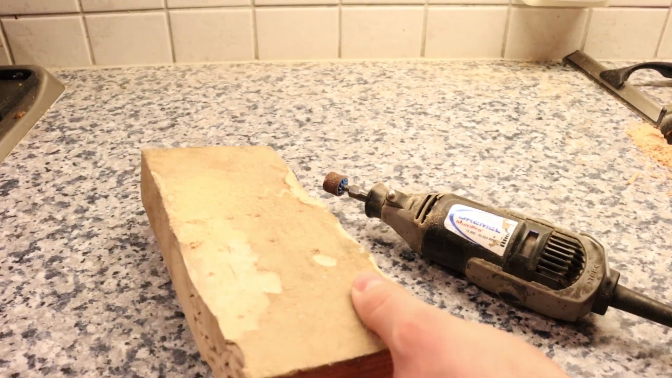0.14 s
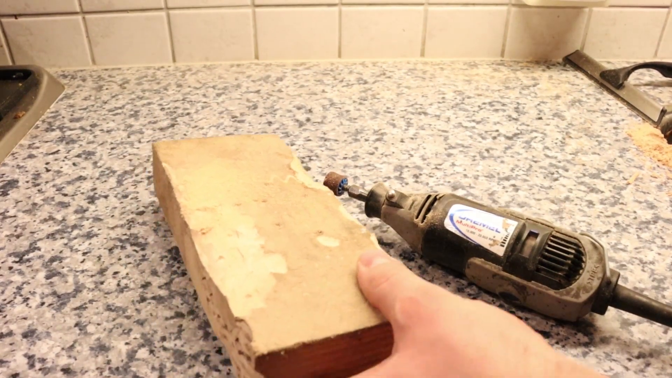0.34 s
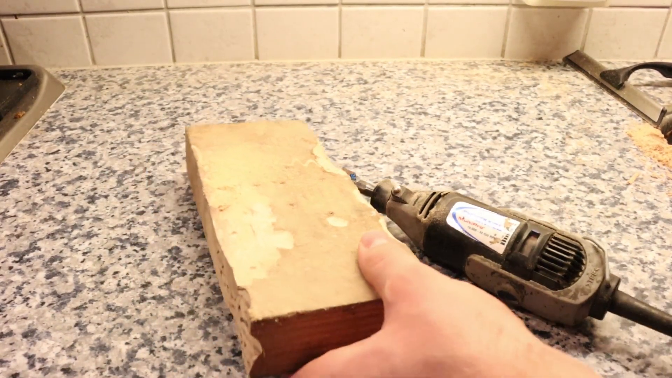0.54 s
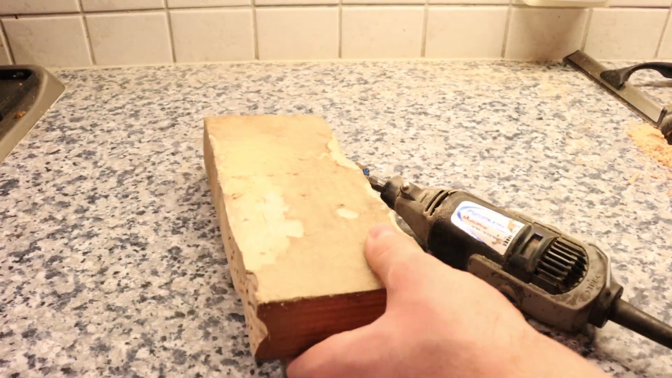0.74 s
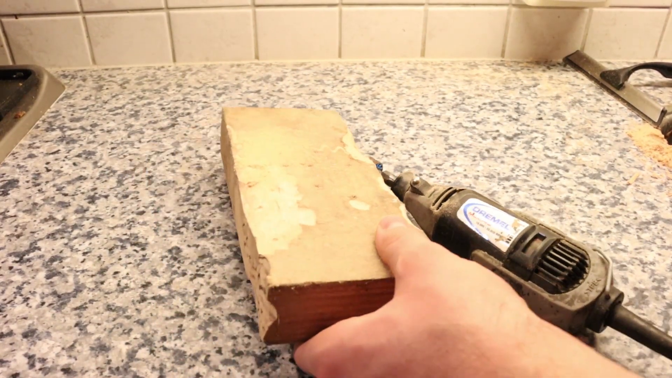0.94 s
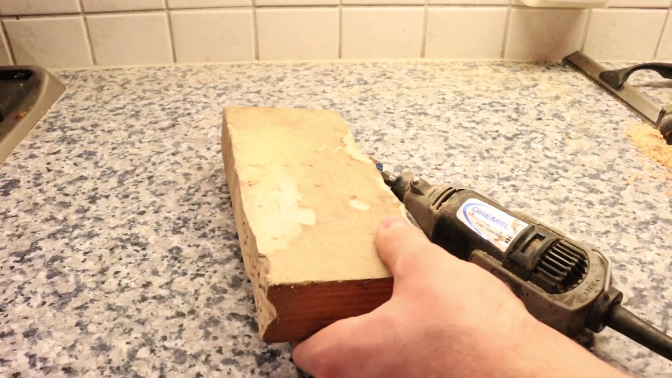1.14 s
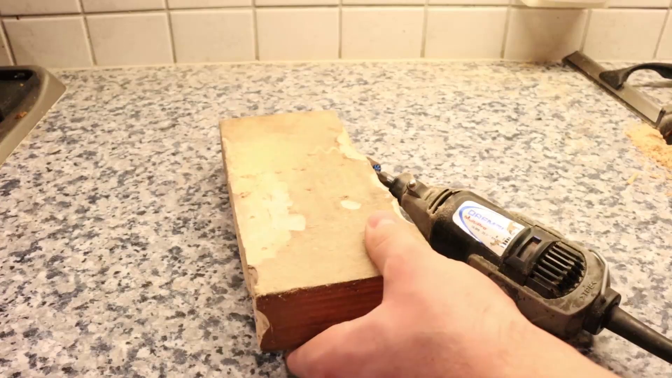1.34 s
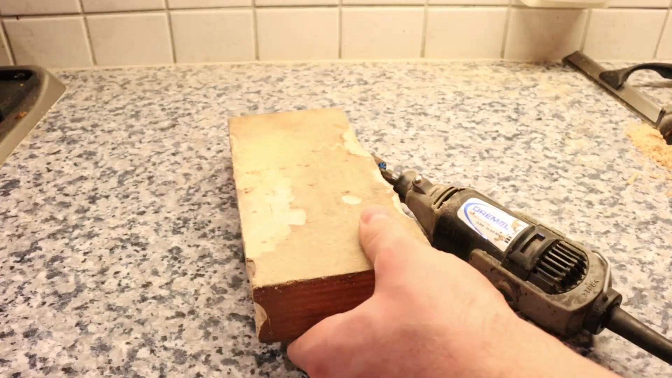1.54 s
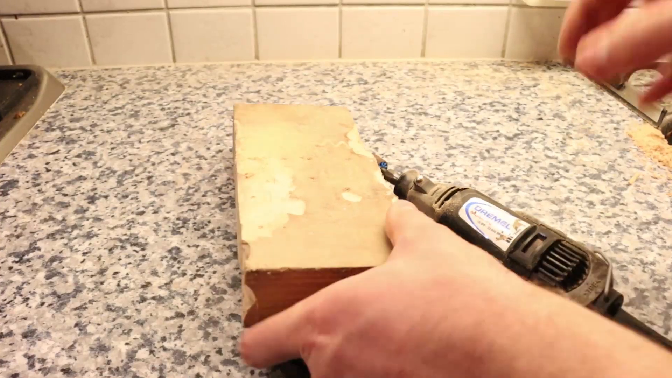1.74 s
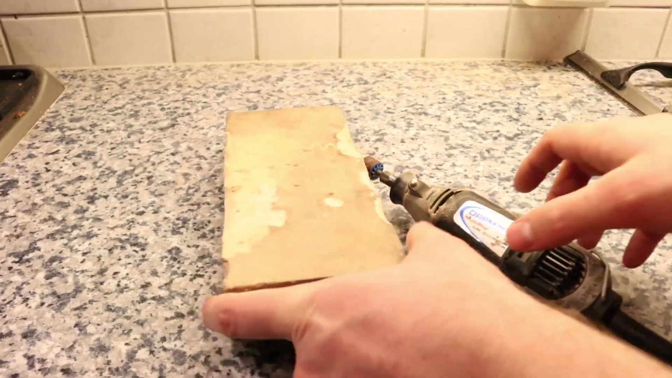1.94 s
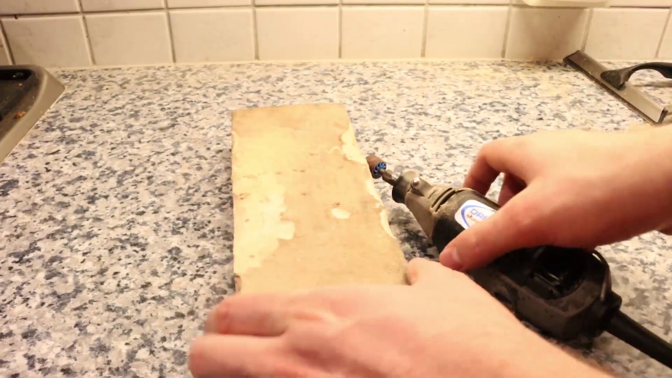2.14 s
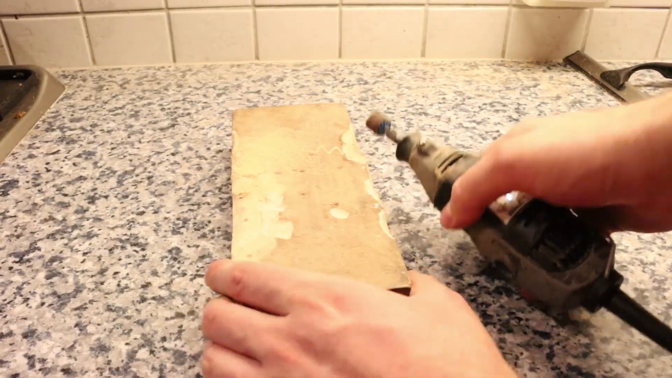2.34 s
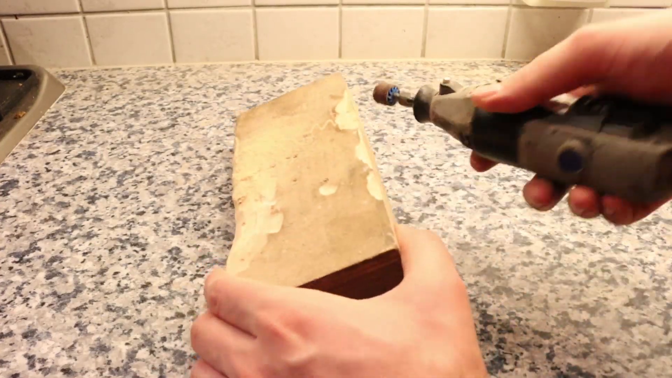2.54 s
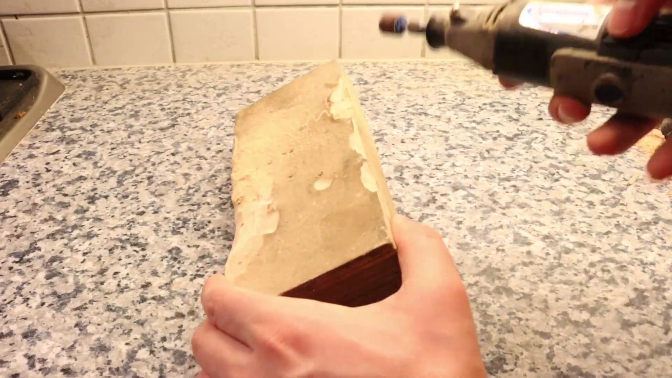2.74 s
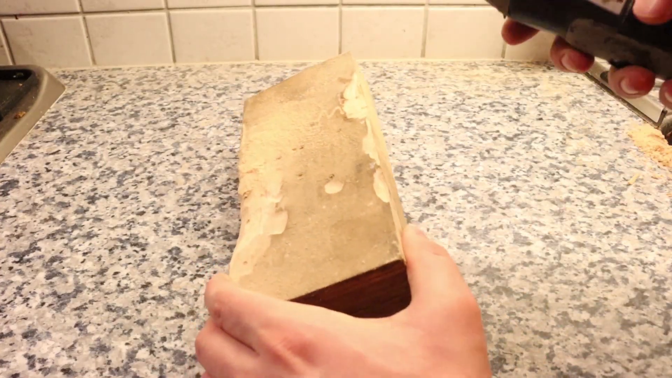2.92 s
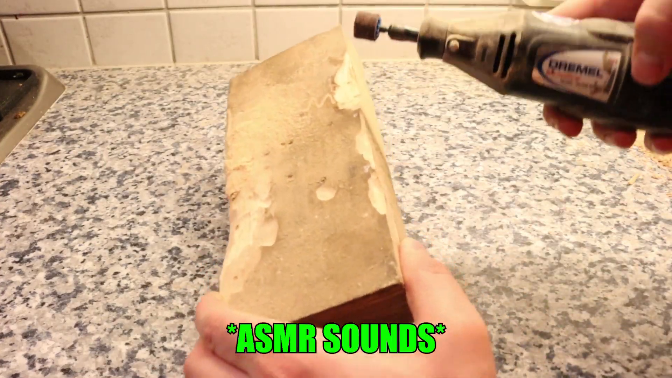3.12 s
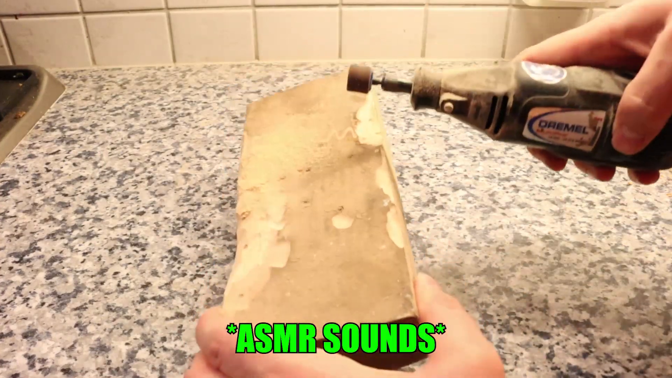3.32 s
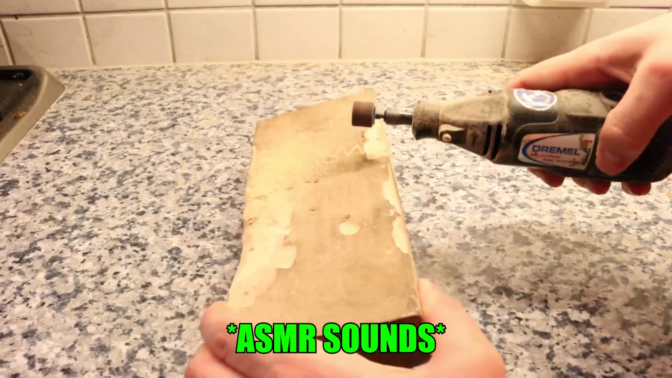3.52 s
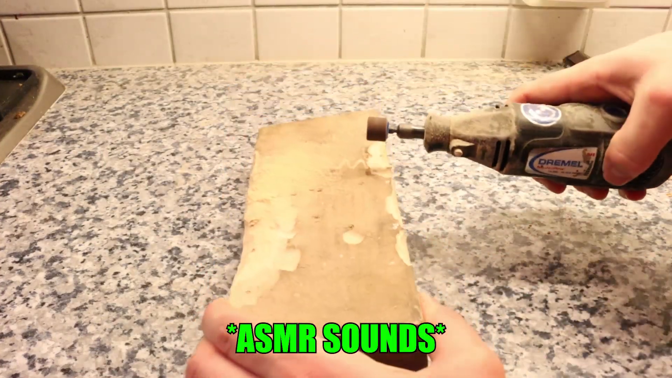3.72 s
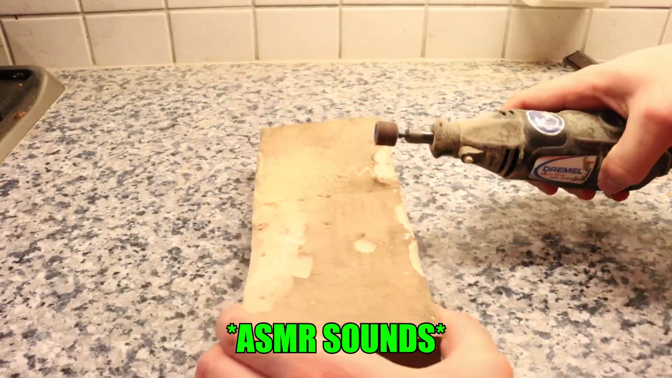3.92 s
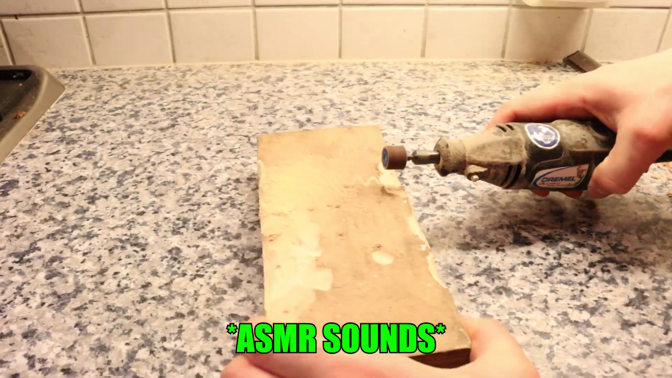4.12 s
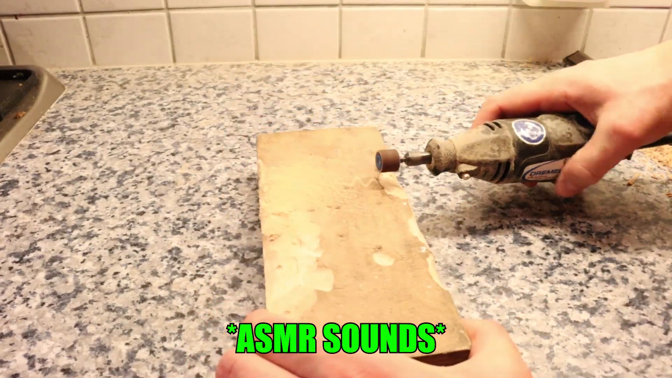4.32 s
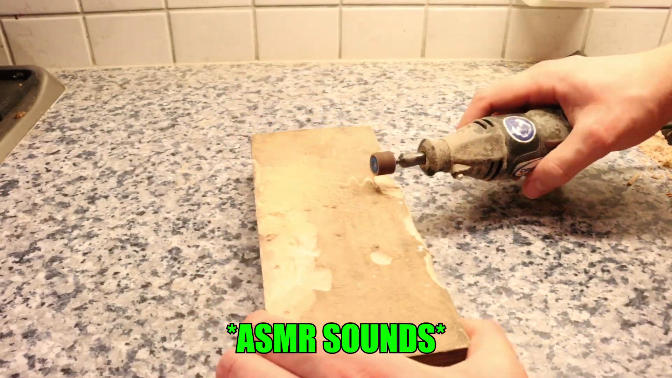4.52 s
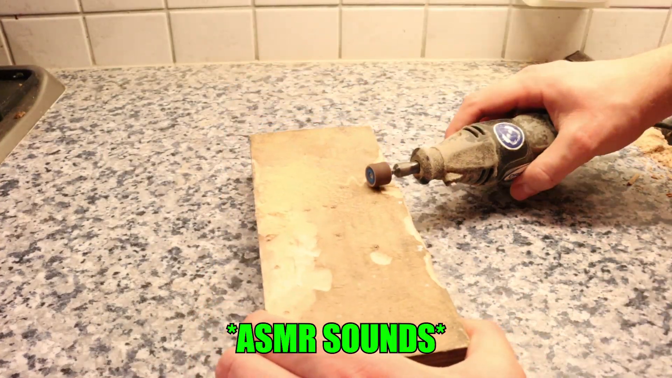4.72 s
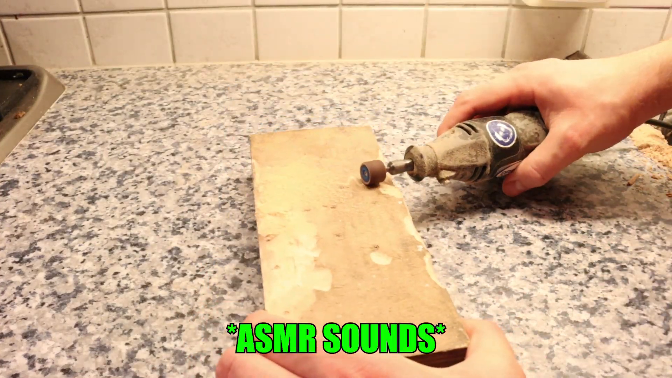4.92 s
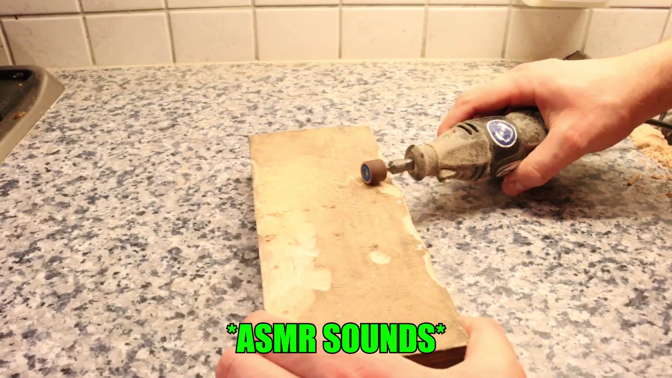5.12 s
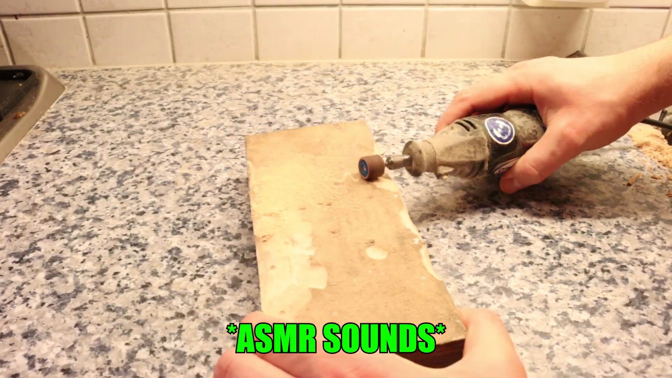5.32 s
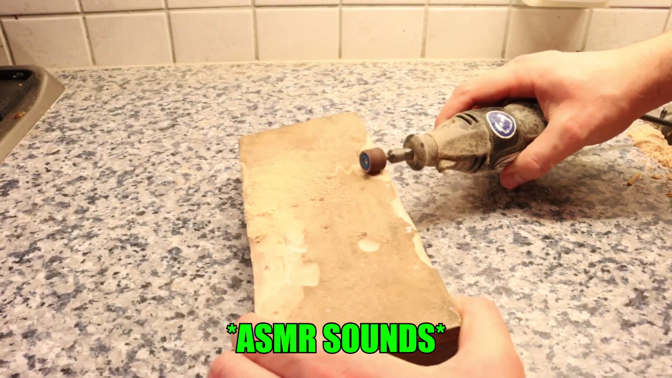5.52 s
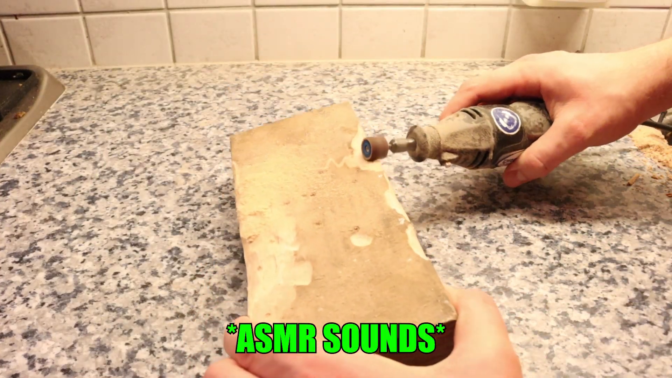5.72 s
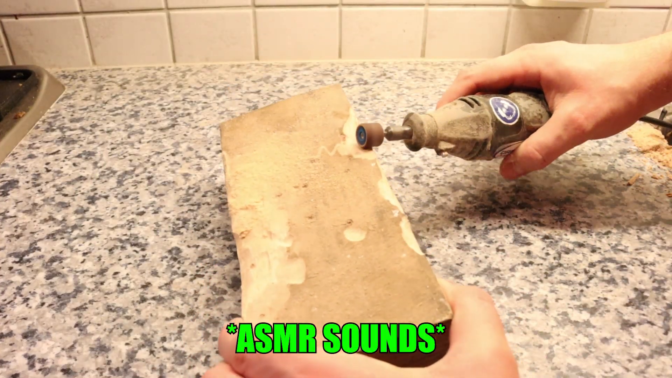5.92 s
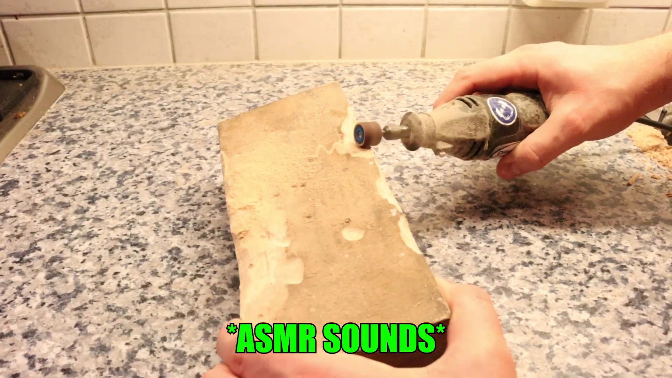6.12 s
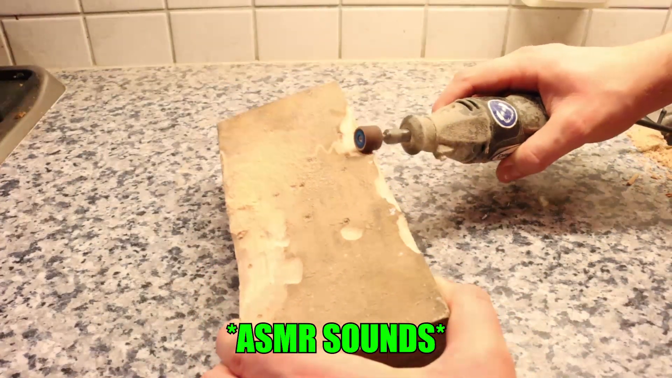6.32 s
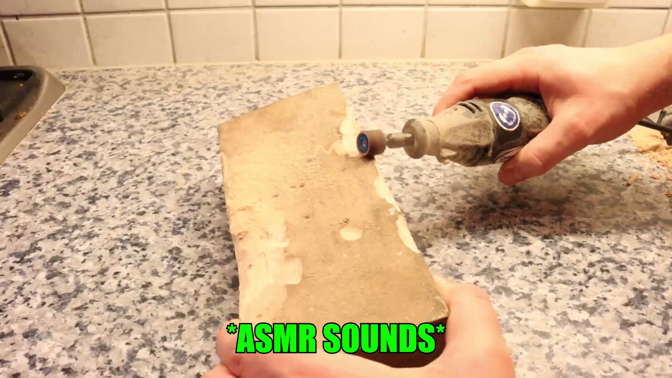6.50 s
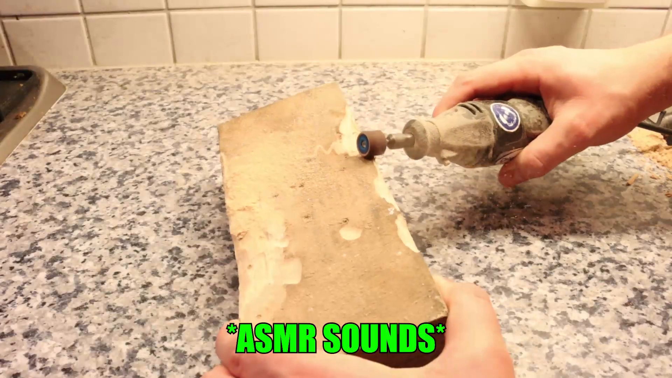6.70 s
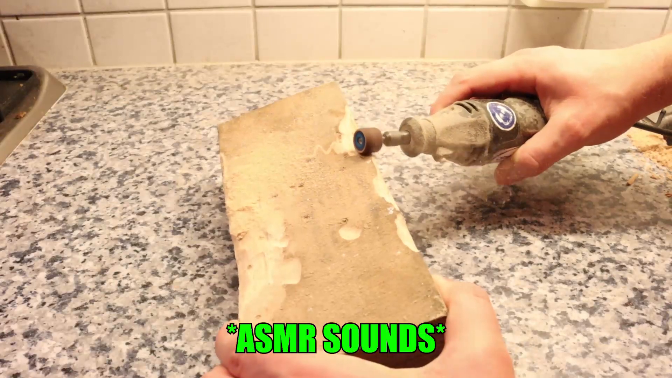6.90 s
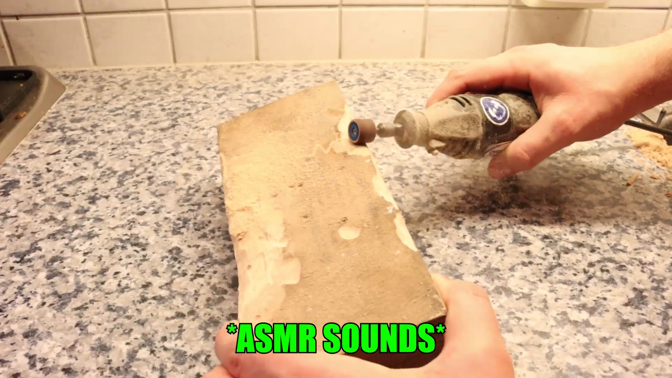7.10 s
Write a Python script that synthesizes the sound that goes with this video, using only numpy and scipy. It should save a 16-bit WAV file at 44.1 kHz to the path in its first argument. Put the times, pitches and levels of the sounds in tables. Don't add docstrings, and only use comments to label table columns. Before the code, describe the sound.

Wood drags, knocks and drops on a kitchen worktop before a handheld rotary motor spins up, hissing and rasping as its drum sands the block.

```python
import sys
import numpy as np
from scipy import signal
from scipy.fft import rfft, irfft, next_fast_len
from scipy.io import wavfile
from scipy.ndimage import uniform_filter1d, map_coordinates

SR = 44100
rng = np.random.default_rng(int(sys.argv[2]) if len(sys.argv) > 2 else 0)


def master(y):
    cut = np.clip(np.atleast_2d(y).T, -1, 1)
    pcm = np.round(cut * 32767)
    wavfile.write(sys.argv[1], SR, pcm.astype(np.int16))


def convert_level_to_amplitude(level_db):
    exponent = np.asarray(level_db, float) / 20
    return 10 ** exponent


N = 315756
T = np.arange(N) / SR

# frequency in Hz, width in Hz, level in dB.
COUNTER_MODES = [(231.5, 22, 2.5), (277, 30, 10.5), (318, 46, 12), (353.3, 12.6, 11), (399.3, 9.3, 9),
                 (483, 28, 1.5)]
CABINET_MODES = [(108, 14, 3.5), (147, 10.7, 16.5)]
PANEL_MODES = [(613, 9.7, 5.5), (670, 20, -3), (857, 32, -4), (934, 9.3, 0), (1090, 150, -10),
               (1295, 100, -1.5)]
BLOCK_MODES = [(1355, 51, 13), (1745, 150, 14), (2350, 400, 3), (3250, 220, -1), (4200, 500, -21.5)]
PUSH_MODES = [(499, 93, 0)]
# frequency in Hz, width in Hz, level in dB.
SLIDE_MODES = [(105, 40, -16), (146.8, 9.4, 5.5), (204, 67, 0), (304.6, 40, 5), (358.6, 4.4, 2),
               (430, 19, -8), (610, 12, -15)]
GRAIN_MODES = [(990, 730, -11.5), (1370, 92, 1.5), (1752, 127, 5), (2758, 95, -1.5), (3120, 53, 0.5),
               (4030, 91, -38)]
APPLIANCE_MODES = [(448, 35, 0)]
# frequency in Hz, width in Hz, level in dB.
HOUSING_MODES = [(1770, 300, -20.5), (2110, 240, -8), (2482, 95, 6.5), (2810, 270, -9), (3230, 180, -6.5)]
BRUSH_CAP_MODES = [(2900, 1100, 11)]
HELD_BLOCK_MODES = [(1366, 63, 12.5), (1723, 166, 19), (1869, 98, 9.5), (2230, 110, 0.5), (2630, 170, 7),
                    (2995, 410, 9), (3222, 84, 11.5), (4030, 320, 10.5)]

# frequency in Hz, density in dB per Hz.
SLEEVE_COLOUR = [(1470, -49), (2500, -0.5), (4320, -0.5), (4730, -1), (5410, -4), (6050, -3.5), (9000, -13),
                 (11700, -50.5), (19800, -120)]
HISS_COLOUR = [(240, -32), (400, -17.5), (453, -17), (1230, -23.5), (1380, -24), (1650, -35), (2180, -21.5),
               (2590, -31), (5960, -34), (9500, -35), (11800, -31), (16000, -37.5)]
LOW_COLOUR = [(12, -45), (20, -53), (38, -8), (70, -29), (102, 3.5), (130, -5), (170, -16), (290, -120)]
GRAZE_COLOUR = [(290, -48), (500, 1.5), (1210, -0.5), (1930, 4), (2230, -7), (3020, 3.5), (3700, -5.5),
                (16000, -12.5)]
# frequency in Hz, density in dB per Hz.
AIR_COLOUR = [(170, -43), (270, -11), (400, -9), (509, -41), (778, -1.5), (1120, -3.5), (2160, 1),
              (4000, -4.5), (5200, -8.5), (8800, -120)]
MIDDLE_COLOUR = [(2500, -10), (3300, 3), (4500, -4.5), (6500, -2), (8000, -10)]
GRIT_COLOUR = [(4500, -14.5), (6000, -4), (7800, -2.5), (8500, -6), (11000, -4.5), (13000, -2),
               (15200, -2.5), (15800, -12.5)]

# frequency in Hz, likeness from 0 to 1.
LIKENESS = [(60, 0.89), (180, 1), (550, 0.8), (1650, 0.31), (4970, 0.014), (15000, 0.021)]
# frequency in Hz, left over right in dB.
TOOL_LEAN = [(60, -3), (150, 2.5), (380, -3.5), (950, 0.5), (2380, -5.5), (5980, -2.5), (15000, -7)]
KNOCK_BALANCE = [(120, 0), (300, -1), (600, 2.5), (1200, 0), (3000, -2)]
# frequency in Hz, 60 dB decay time in seconds.
ROOM_DECAY = [(150, 0.14), (600, 0.34), (2000, 0.23), (8000, 0.048)]

# time in seconds, block sliding in dB, hand and sleeve rubbing in dB.
EFFORT = [(0, -54, -75), (.2, -51.5, -63.5), (.39, -59, -59.5), (.56, -47.5, -58), (.83, -58, -60.5),
          (.97, -58.5, -67), (1.3, -64, -78), (1.58, -57.5, -66.5), (1.73, -60, -61.5), (1.83, -50, -49.5),
          (1.95, -57, -66), (2.14, -88, -57.5), (2.4, -58.5, -69), (2.55, -54, -67), (2.92, -70.5, -68.5),
          (3.1, -69, -70), (3.28, -76, -76.5), (3.5, -99, -76), (3.8, -102, -104)]
# time in seconds, level in dB, half length in seconds.
SHIFTS = [
    (0.47, -41, 0.16),
    (0.91, -45, 0.094),
    (2.16, -38, 0.11),
    (4.2, -57, 0.16),
    (5.026, -62, 0.17),
    (4.517, -66, 0.042),
]
# time in seconds, level in dB, half length in seconds.
GRAIN_DRAGS = [
    (0.47, -53.5, 0.13),
    (1.872, -44, 0.087),
    (2.329, -48, 0.033),
    (2.386, -44, 0.0043),
    (2.888, -55.5, .008),
    (2.91, -62, 0.011),
    (3.23, -56.5, 0.017),
]
# time in seconds, level in dB, half length in seconds.
GRAZES = [
    (0.192, -45, 0.01),
    (0.698, -40, 0.018),
    (1.327, -55, 0.045),
    (1.83, -64, 0.04),
    (2.726, -53.5, 0.049),
]
# time in seconds, level in dB, half length in seconds.
DRUM_TOUCHES = [
    (4.862, -40, .006),
    (5.777, -46, .003),
]
# time in seconds, pitch in Hz, level in dB.
SKIN_SQUEAK = [(1.53, 4400, -64), (1.57, 4630, -46.5), (1.69, 5150, -44), (1.85, 4670, -56),
               (1.95, 4140, -39), (2.03, 4250, -57), (2.09, 4610, -48), (2.25, 5350, -53),
               (2.38, 4350, -45), (2.44, 4030, -50)]

# time in seconds, peak in dB, hardness in dB, 60 dB decay in seconds, counter tilt in dB per octave.
BUMPS = [
    (.179, -38, -23, 0.45, -9.5),
    (.244, -33, -23, .2, 5),
    (.47, -38, -14, 0.14, 6),
    (.574, -25.5, -18, 0.57, 2),
    (.646, -33, -31, 0.25, 5),
]
DROPS = [(1.969, -6.5, 1, 0.2, 6), (2.018, -10, -3.5, 0.91, 3), (2.043, -17, -10, 0.26, 16),
         (2.092, -15.5, -11.5, 0.27, 14), (2.1435, -9.5, -16.5, 0.18, 0.5), (2.152, -8.5, -13.5, .068, 2),
         (2.167, -12, -28, 0.26, 20), (2.48, -17.5, -30, 0.26, 2.5), (2.515, -27, -38, 0.16, 6),
         (2.541, -26, -29, 0.12, 7), (2.583, -33.5, -47, .1, 3), (2.929, -33, -4, 0.15, -2),
         (2.935, -34, -1, 0.096, 2), (2.957, -32, -13, 0.25, 5), (3.754, -23.5, -20, 0.62, 2.5)]
TAPS = [
    (1.125, -55.5, 9, .15, -4),
    (1.461, -52, 8, .1, 5),
    (2.33, -52, -31, 0.17, -11),
    (2.43, -50.5, -30, 0.19, -6),
    (2.7, -47, -25, .15, 2),
    (3.138, -46, -9, 0.14, 2),
    (3.172, -52, 2, 0.22, -1),
    (4.291, -63.5, -9.5, .15, 1),
]
SWITCH = [
    (3.321, -39.5, 8.5, 0.29, 8.9),
    (3.329, -67, 0, 0.089, 3),
    (3.351, -36, -21, 0.29, 8),
    (3.395, -52, 8, 0.13, 3),
]
# knocks, cabinet boom in dB, panel over hardness in dB.
KNOCK_KINDS = [(BUMPS, -11.5, 2), (DROPS, -12.5, 1.2), (TAPS, -1.4, 2.3), (SWITCH, -38, -3.5)]

# time in seconds, shaft speed in Hz.
RUN_UP = [(3.4, 62), (3.5, 95), (3.6, 115), (3.68, 140), (3.8, 174), (4, 217), (4.2, 261), (4.36, 305),
          (4.52, 338), (4.7, 364)]
# time in seconds, shaft speed in Hz, drum pressure in dB, shaft tone in dB.
LOAD = [(4.84, 377, -43.5, -50.5), (5.019, 384.9, -47, -51.5), (5.1, 380, -47.5, -46),
        (5.271, 378.6, -52, -51.5), (5.37, 376.2, -46, -50), (5.52, 365.4, -48.5, -41.5),
        (5.611, 358.7, -57.5, -55), (5.711, 369.6, -47, -59), (5.83, 381.4, -52.5, -57),
        (6.079, 376.8, -52, -56), (6.249, 367.4, -52, -51), (6.421, 365, -54.5, -51.5),
        (6.559, 357.6, -50.5, -48.5), (6.661, 350.5, -51, -53.5), (6.82, 342.5, -56, -61.5),
        (6.888, 340.6, -59, -60.5), (7.052, 330.7, -55.5, -55.5), (7.16, 325.6, -59, -56)]
# time in seconds, level in dB.
AIRFLOW = [(3.5, -52), (3.57, -52), (4.12, -40.5), (4.39, -50.5), (4.75, -45), (5.0, -38.5), (5.02, -38.5),
           (5.51, -41), (5.63, -51), (5.76, -49), (5.77, -43.5), (5.93, -39.5), (5.95, -42.5), (6.38, -42),
           (6.39, -44.5), (6.56, -39.5), (6.64, -47), (7.14, -46), (7.16, -49)]
# multiple of shaft speed, level in dB.
WHINE_ORDERS = [(16, -8), (20, -13), (22, -16), (24, -11), (28, -16), (32, -12), (36, -18), ]
SLOT_ORDERS = [(8, 0.5), (9, -26), (16, -7)]
SEAM_ORDERS = [(2, -12.5), (3, -8), (4, -10), (5, -9.5), (6, -5), (7, -9), (8, -6), (9, -5.5), (10, -11),
               (11, -9.5), (12, -16), (13, -10.5)]
# time in seconds, level in dB, half hold in seconds, rise in dB per second, fall in dB per second.
BUZZ_PASSES = [
    (3.734, -37, 0.011, 93, 57),
    (4.313, -36.5, 0.11, 27, 120),
]
# start in seconds, end in seconds.
CONTACTS = [
    (4.86, 5.61),
    (5.775, 7.2),
]
BITE_S = [0.18, 0.051]
FIRST_GRAB = [1.0, .6]
# time in seconds, order, swell in dB, half length in seconds.
CATCHES = [(4.967, 5, -5, 0.088), (4.97, 11, -18, 0.092), (4.99, 7, -11, 0.055), (5.04, 8, 3.5, 0.035),
           (5.175, 7, 10.5, 0.084), (5.144, 11, 8.5, 0.12), (5.324, 5, 11, 0.091), (5.418, 8, 2, 0.034),
           (5.44, 7, 8, 0.022), (5.467, 11, 10.5, 0.051), (5.563, 11, 2, 0.032), (5.538, 9, 21, 0.027),
           (5.825, 8, 14, 0.01), (5.894, 7, 10.5, 0.022), (6.012, 8, 15, 0.0097), (6.089, 5, 6.5, 0.059),
           (6.168, 8, 8, 0.055), (6.153, 7, 14, 0.0096), (6.157, 11, 13, 0.0089), (6.196, 6, 7, .04),
           (6.26, 5, 10, 0.037), (6.283, 7, -10, 0.047), (6.295, 11, 7, 0.077), (6.389, 5, 13, 0.027),
           (6.4, 7, 7, .03), (6.443, 8, 8, 0.022), (6.469, 9, 8.5, 0.027), (6.47, 11, 11.5, 0.03),
           (6.5, 5, 6.5, 0.027), (6.535, 13, 11, 0.086), (6.586, 9, 8, 0.029), (6.645, 5, 9, 0.073),
           (6.649, 7, 12, 0.031), (6.683, 9, 8, 0.027), (6.724, 11, -10, 0.082), (6.789, 6, 14.5, 0.1),
           (6.79, 9, 7.5, 0.036), (6.795, 5, 13.5, 0.043), (6.917, 8, 12, .025), (6.929, 12, 17, 0.064),
           (6.982, 8, -8, 0.021), (7.001, 7, 0, .08), (7.02, 6, 11.5, 0.071), (7.046, 9, 12, 0.12),
           (7.129, 12, 19, 0.024), (7.131, 11, 12, 0.029)]
# time in seconds, order, swell
# in dB, half length in seconds.
GRIPS = [(4.995, 4, 3, 0.05), (5.0, 10, 1, .05), (5.1, 13, 6.5, .06), (4.89, 8, -7, .025),
         (5.153, 6, 11, 0.1), (5.165, 3, -2, 0.09), (5.22, 8, -4, 0.026), (5.4, 2, -6, 0.074),
         (5.4, 9, 3, 0.035), (5.502, 12, 15, 0.1), (5.524, 13, 9, .04), (5.528, 10, 14, 0.078),
         (5.56, 6, -2, 0.059), (5.996, 4, -11, .1), (6.02, 9, -7, .1), (6.299, 3, -2.5, .1),
         (6.306, 8, -6, 0.079), (6.42, 6, -7, 0.15), (6.443, 5, -8, 0.013), (6.55, 3, 4.5, 0.12),
         (6.675, 6, -1, .04), (6.73, 5, 1.5, 0.054), (6.74, 9, 3, 0.04), (6.946, 9, 2.5, 0.048),
         (7.05, 4, 8, .06), (7.11, 10, 11, .04), (7.138, 5, -7, 0.038)]
# time in seconds, level in dB, half length in seconds.
SKIPS = [
    (6.329, -2.5, 0.012),
    (6.435, 0, 0.011),
    (6.634, 0.5, 0.0097),
    (6.874, -1, 0.016),
]
# time in seconds, left over right in dB, half length in seconds.
SWINGS = [
    (4.3, -1, 0.22),
    (6, 1.5, 1.2),
]

START_S, TOP_SPEED_HZ = 3.4, 380
HALF_WAVES_HZ = 99.7
LANDING_S, CUT_S = DROPS[0][0], LOAD[0][0]
SIDES = np.array([[.5], [-.5]])


def unit(x):
    return x / np.sqrt(np.mean(x ** 2) + 1e-20)


def along(points, hz):
    f, v = np.transpose(points)
    return np.interp(np.log(hz + 1), np.log(f + 1), v)


def curves(rows, before=None, after=None):
    s, *cols = np.transpose(rows)
    return [np.interp(T, s, c, before, after) for c in cols]


def wobble(rate):
    knots = rng.standard_normal(int(N * rate / SR) + 4)
    return map_coordinates(knots, [np.arange(N) * rate / SR], order=1)


def bump(s, half):
    return np.exp(-((T - s) / half) ** 2)


def swells(events):
    return sum(db * bump(s, half) for s, db, half in events)


def puffs(events):
    return sum(convert_level_to_amplitude(db) * bump(s, half) for s, db, half in events)


def filtered(x, response):
    m = next_fast_len(x.shape[-1] + 8192)
    return irfft(rfft(x, m) * response(np.fft.rfftfreq(m, 1 / SR)), m)[..., :x.shape[-1]]


def band(lo_hz, hi_hz):
    return lambda f: (1j * f / (lo_hz + 1j * f)) ** 3 / (1 + 1j * f / hi_hz) ** 3


def body(modes, sign=-1):
    def mode(f, hz, width, db):
        return convert_level_to_amplitude(db) * 1j * f * width / (hz * hz - f * f + 1j * f * width + 1e-9)
    return lambda f: sum(sign ** k * mode(f, *row) for k, row in enumerate(modes))


def shaped(spectrum):
    return lambda hz: convert_level_to_amplitude(along(spectrum, hz))


def rush(colour, grain_db=0, rate=100):
    def spread(hz):
        angle = np.arccos(np.clip(along(LIKENESS, hz), -1, 1)) / 2
        return colour(hz) * [np.cos(angle), np.sin(angle)]
    pair = rng.standard_normal((2, N)) * convert_level_to_amplitude(grain_db * wobble(rate))
    mid, side = filtered(pair, spread)
    return unit(np.array([mid + side, mid - side]))


def room(x):
    hz, t, z = signal.stft(rng.standard_normal((2, SR // 2)), SR, nperseg=256)
    mono = 1 / (1 + (hz[:, None] / 320) ** 4)
    z = np.array([z[0], mono ** .5 * z[0] + (1 - mono) ** .5 * z[1]])
    decay = convert_level_to_amplitude(-60 * t / along(ROOM_DECAY, hz)[:, None])
    tail = signal.istft(z * decay, SR, nperseg=256)[1]
    late = np.pad(x, (200, 0))[None]
    return signal.fftconvolve(late, tail / np.linalg.norm(tail[0]), axes=1)[:, :N]


def sliding_block(block_db, duck):
    shake = (T > START_S) * convert_level_to_amplitude(-77 - 20 * (T - START_S))
    weight = convert_level_to_amplitude(block_db + 4.5 + 2.2 * wobble(10.6)) + shake + puffs(SHIFTS)
    low = lambda f: body(SLIDE_MODES)(f) * band(60, 890)(f)
    high = lambda f: body(GRAIN_MODES)(f) * band(720, 15000)(f)
    rumble = weight * rush(low, grain_db=-1.0, rate=34)
    drag = convert_level_to_amplitude(block_db - 1.0) + puffs(GRAIN_DRAGS)
    return rumble + duck * drag * rush(high, grain_db=2.5, rate=180)


def sleeve(hand_db):
    return convert_level_to_amplitude(hand_db + 6.0) * rush(shaped(SLEEVE_COLOUR), grain_db=1.6, rate=42)


def room_hiss(hand_db):
    return convert_level_to_amplitude(-59 + 0.51 * (hand_db - EFFORT[0][2])) * rush(shaped(HISS_COLOUR))


def floor_hum():
    tone = np.sin(2 * np.pi * 48 * T + .3 * wobble(3.1))
    level_db = -58 - 9.5 * np.maximum(T - 2.1, 0)
    return convert_level_to_amplitude(level_db) * (rush(shaped(LOW_COLOUR)) + convert_level_to_amplitude(-5.5) * tone)


def appliance():
    return convert_level_to_amplitude(-60 - 2.5 * T) * rush(lambda f: body(APPLIANCE_MODES)(f) ** 2)


def handling():
    block_db, hand_db = curves(EFFORT)
    since = T - LANDING_S
    duck = convert_level_to_amplitude(-35 * (since > 0) * np.exp(-(since / 0.072) ** 2))
    background = sleeve(hand_db) + room_hiss(hand_db) + appliance() + squeak()
    return sliding_block(block_db, duck) + floor_hum() + grazes() + duck * background


def knock(t, hard_db, t60, tilt_db, boom_db, panel_db):
    spot = [(hz, w, level + tilt_db * np.log2(hz / 320)) for hz, w, level in COUNTER_MODES]
    # resonances, level in dB, share of the decay, softening Hz, rattle
    parts = [(spot, 0, 1, 800, .007),
             (CABINET_MODES, boom_db - tilt_db, 1.2, 300, .009),
             (PANEL_MODES, panel_db + hard_db, 1.3, 1700, .009),
             (BLOCK_MODES, hard_db, .4, 4200, .009),
             (PUSH_MODES, 1.5 + min(hard_db, 0) / 2, .1, 2000, .008)]
    contact_hz = 3500 * 2 ** (min(hard_db, 0) / 9.5)
    out = 0
    for modes, part_db, lasting, soft_hz, rattle in parts:
        decay = convert_level_to_amplitude(-60 * t / max(lasting * t60, .01))
        blow = rattle * decay * rng.standard_normal(len(t)) - (t == 0)

        def path(f):
            direct = 0.24 / (1 + 1j * f / soft_hz) ** 2
            blunt = 1 / (1 + 1j * f / contact_hz) ** 2
            return (body(modes, sign=1)(f) + direct) * blunt * band(modes[0][0] / 2, soft_hz)(f)
        ring = filtered(blow, path)
        out = out + convert_level_to_amplitude(part_db + 2.0) * ring / np.abs(ring).max()
    return out


def landing(t):
    snap = convert_level_to_amplitude(-26 - 60 * t / 0.0098) * rng.standard_normal(len(t))
    thump = convert_level_to_amplitude(-26) * np.sin(np.pi * t / 0.0088) * np.exp(-t / 0.0088)
    return filtered(snap, band(2600, 11600)) - thump


def knocks():
    out, t = np.zeros(N + SR), np.arange(SR // 2) / SR

    def place(s, sound):
        out[round((s + .0015) * SR):][:len(t)] += sound
    for rows, boom_db, panel_db in KNOCK_KINDS:
        for s, db, hard_db, t60, tilt_db in rows:
            place(s, convert_level_to_amplitude(db) * knock(t, hard_db, t60, tilt_db, boom_db, panel_db))
    place(LANDING_S, landing(t))
    return out[:N]


def grazes():
    return puffs(GRAZES + DRUM_TOUCHES) * rush(shaped(GRAZE_COLOUR))


def squeak():
    hz, db = curves(SKIN_SQUEAK, -99, -99)
    tones = 0
    for k in (.92, .96, 1, 1.05, 1.12, 1.2, 2.1, 2.3, 2.7):
        swell = 1 + .7 * wobble(60)
        ragged_hz = k * hz * (1 + .03 * wobble(900) + .01 * wobble(25))
        tones = tones + swell * np.sin(2 * np.pi * np.cumsum(ragged_hz) / SR) / k
    return convert_level_to_amplitude(db - 17) * tones


def shaft():
    hz = curves(RUN_UP + [row[:2] for row in LOAD])[0]
    unsteady = 0.001114 + 0.00617 * (1 - hz / TOP_SPEED_HZ).clip(0) * (T < CUT_S)
    return hz, 2 * np.pi * np.cumsum(hz * (1 + unsteady * wobble(60))) / SR


def line(turn, order, db):
    return 2 ** .5 * convert_level_to_amplitude(db) * np.sin(order * turn + rng.uniform(0, 2 * np.pi))


def unbalance(shaft_hz, turn, tone_db):
    rise_db = (20 + 9 * wobble(14)) * (CUT_S - T).clip(0)
    return np.clip(shaft_hz / 40 - 6.5, 0, 1) * line(turn, 1, tone_db - rise_db)


def whine(shaft_hz, turn, slice_, middle_db):
    running_up = np.clip((300 - shaft_hz) / 60, .25, 1) * np.clip(shaft_hz / 30 - 2.6, 0, 1)
    faces = bump(3.63, .13)
    tones = 0
    for k, db in WHINE_ORDERS:
        cap = 1 + np.abs(body(BRUSH_CAP_MODES)(k * shaft_hz)) ** 2 * faces
        tones = tones + line(turn, k, middle_db + db + 3 * wobble(45)) * cap
    return running_up * (.5 + 1.3 * slice_) * tones


def slot_buzz(shaft_hz, turn, slice_):
    db = np.max([level - np.maximum(rise * (s - hold - T), fall * (T - s - hold)).clip(0)
                 for s, level, hold, rise, fall in BUZZ_PASSES], axis=0)
    db = np.where((T > START_S) & (T < CUT_S), np.maximum(db, -54.5), -99)
    slots = sum(line(turn, k, level + 2.2 * wobble(100)) for k, level in SLOT_ORDERS)
    housing = body(HOUSING_MODES)
    loudest = np.sqrt(sum(np.abs(housing(k * shaft_hz) * convert_level_to_amplitude(level)) ** 2 for k, level in SLOT_ORDERS))
    bursts = slice_ + 0.076 + 0.089 * ((shaft_hz - 270) / 40).clip(0, 1)
    return filtered(convert_level_to_amplitude(db + 10.0) * bursts * slots / (loudest + 0.33), housing)


def fan(shaft_hz, turn):
    fan_db, away_db, away_s = -57, -10, 6.08
    speed_db = .4 * 20 * np.log10(shaft_hz / TOP_SPEED_HZ)
    shaded_db = -9 * bump(4.32, .08)
    first_db = fan_db + speed_db + away_db * bump(away_s, .3) + shaded_db + 4 * wobble(30)
    second_db = fan_db - 9 + away_db * (T > away_s) + 4 * wobble(20)
    first = np.clip(shaft_hz / 30 - 5.5, 0, 1) * line(turn, 18, first_db)
    return first + np.clip(shaft_hz / 30 - 11, 0, 1) * line(turn, 36, second_db)


def drum_contact():
    firm = 0
    for (a, b), bite, grab in zip(CONTACTS, BITE_S, FIRST_GRAB):
        settle = ((T - a) / bite).clip(.3, 1) ** 0.88
        firm = firm + (T > a) * (T < b) * settle + grab * bump(a + 0.0038, 0.0057)
    return uniform_filter1d(firm, size=300)


def caught_db(order):
    catches = sum(db * bump(s, half) for s, k, db, half in CATCHES if k == order)
    grips = sum(db * np.minimum(1.1 * bump(s, half), 1) for s, k, db, half in GRIPS if k == order)
    return catches + grips


def drum_seam(shaft_hz, turn, pressure_db, middle_db, upper_db):
    def sings(f):
        peaks = [convert_level_to_amplitude(db) / (1 + (2 * (f - hz) / w) ** 2) for hz, w, db in HELD_BLOCK_MODES]
        return np.sqrt(1 + sum(p ** 2 for p in peaks))
    seam = 0
    for k, db in SEAM_ORDERS:
        level_db = pressure_db + db + caught_db(k) + .5 * wobble(14) + 1.5 * wobble(45)
        seam = seam + sings(k * shaft_hz) * line(turn, k, level_db)
    for k in range(14, 18):
        seam += line(turn, k, middle_db - 15 + 2.5 * wobble(25))
    for k in range(19, 48):
        hz = k * shaft_hz
        ringing_db = 6.5 * bump(6.6, 0.39) * (hz > .95 * 15000)
        level_db = upper_db - 15 + along(GRIT_COLOUR, hz) + 5.5 * wobble(32) + ringing_db
        seam += line(turn, k, level_db)
    return seam


def vent_air(air_db, middle_db, touching):
    shade_db = -1.5 * ((T - 5.8) / 0.061).clip(0, 1)
    low_db = air_db + 8.0 - 3.16 * touching + shade_db
    low = convert_level_to_amplitude(low_db) * rush(shaped(AIR_COLOUR), grain_db=2.0, rate=40)
    middle = convert_level_to_amplitude(middle_db - 1.5 * touching) * rush(shaped(MIDDLE_COLOUR), grain_db=2.4, rate=45)
    return low + middle


def grit(upper_db, touching, chatter):
    level_db = upper_db + .5 + (1.5 * wobble(28) - 3) * touching
    spray = rush(shaped(GRIT_COLOUR), grain_db=1.1, rate=60)
    return (1 + touching * (chatter - 1)) * convert_level_to_amplitude(level_db) * spray


def mains_beat(turn, tone_db):
    pull = np.minimum(1.6 * bump(5.05, 0.185), 1)
    mains = 2 * np.pi * HALF_WAVES_HZ * T
    return convert_level_to_amplitude(tone_db - 11 + 3 * wobble(16)) * pull * (np.sin(turn - mains) + .5 * np.sin(2 * mains))


def tool():
    shaft_hz, turn = shaft()
    pressure_db, tone_db = curves(LOAD)[1:]
    swing_db = curves([(START_S, -70)] + AIRFLOW)[0] + 43
    off_db = -40 * (T < START_S)
    air_db = -51.5 + 0.62 * swing_db + off_db
    middle_db = -49 + 0.96 * swing_db + off_db
    upper_db = -47 + 0.8 * swing_db + off_db
    slice_ = np.exp(5 * (np.cos(2 * np.pi * HALF_WAVES_HZ * (T - 4.2295)) - 1))
    touching = drum_contact()
    chatter = convert_level_to_amplitude(1.4 * wobble(35) + swells(SKIPS))
    buzz = slot_buzz(shaft_hz, turn, slice_)
    lines = whine(shaft_hz, turn, slice_, middle_db) + fan(shaft_hz, turn)
    seam = drum_seam(shaft_hz, turn, pressure_db, middle_db, upper_db)
    lines += (0.016 + touching) * (T > CUT_S) * chatter * seam
    throb = 1 + 0.093 * np.cos(turn) + 0.033 * slice_
    noise = throb * (vent_air(air_db, middle_db, touching) + grit(upper_db, touching, chatter))
    walls = convert_level_to_amplitude(-11) * room(lines + .4 * buzz)
    hum = unbalance(shaft_hz, turn, tone_db) + mains_beat(turn, tone_db)
    return tool_position(hum + lines + buzz + walls + noise)


def tool_position(sound):
    def ports(hz):
        lag = 4e-5 * hz / (1 + (hz / 5000) ** 2)
        delay = np.exp(-1j * np.pi * lag * [[1], [-1]])
        return convert_level_to_amplitude(along(TOOL_LEAN, hz) * SIDES) * band(150, 60000)(hz) * delay
    return filtered(sound * convert_level_to_amplitude(swells(SWINGS) * SIDES), ports)


def scene():
    hands, blows, running = handling(), knocks(), tool()
    near = filtered(blows, lambda hz: convert_level_to_amplitude(along(KNOCK_BALANCE, hz) * SIDES))
    return running + hands + near + convert_level_to_amplitude(-10.5) * room(blows)


def roll_off(x):
    return signal.sosfilt(signal.butter(12, 16820, fs=SR, output="sos"), x)


def record(dry):
    squashed = dry / (1 + np.abs(dry / .82) ** 6) ** (1 / 6)
    mix = filtered(squashed, lambda hz: hz < 15850)
    return roll_off(mix)


dry = scene()
out = record(dry)
master(out)
```